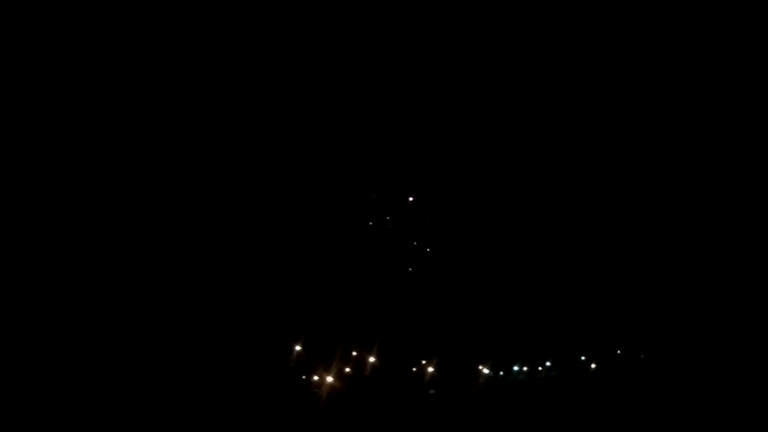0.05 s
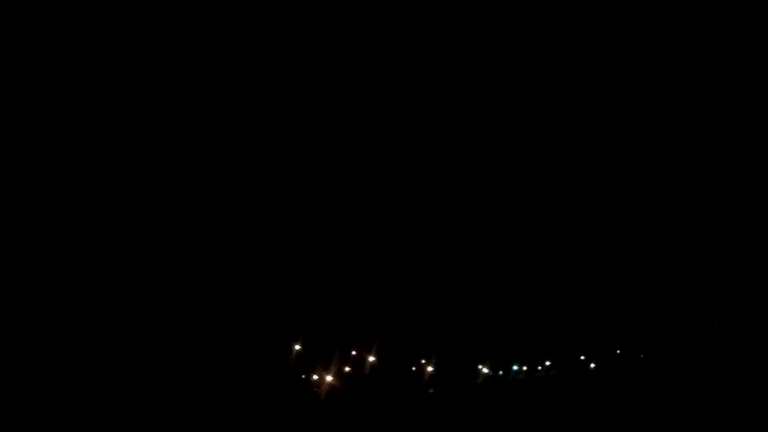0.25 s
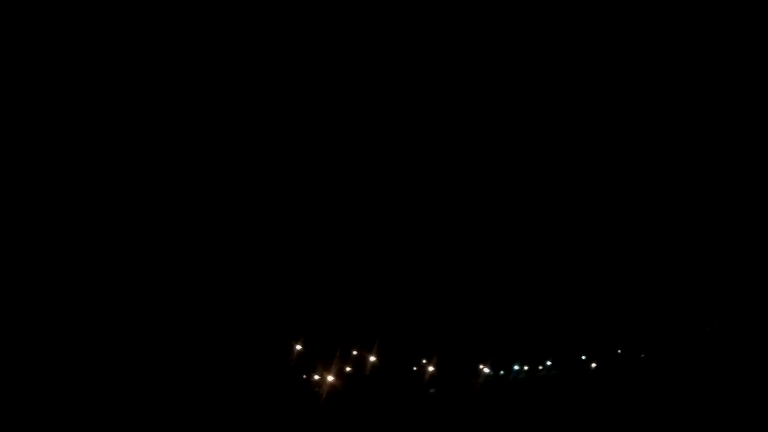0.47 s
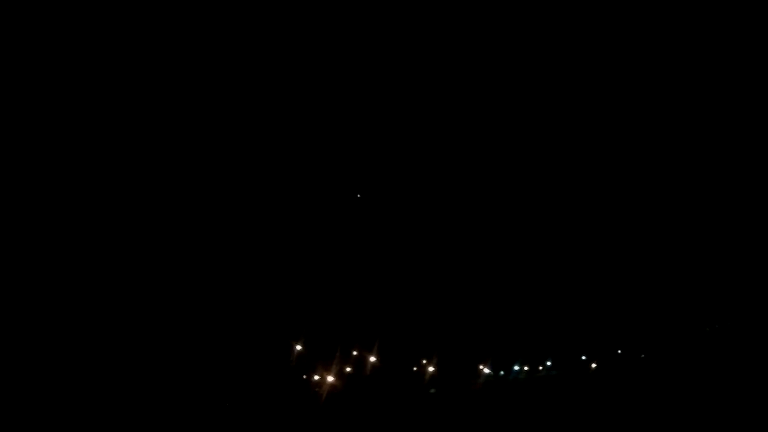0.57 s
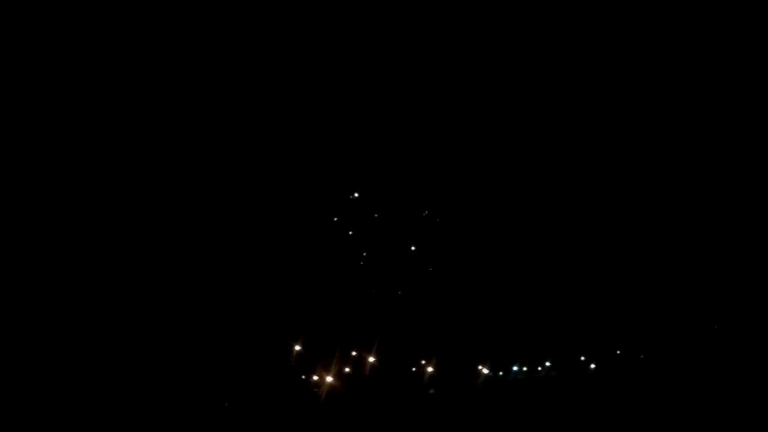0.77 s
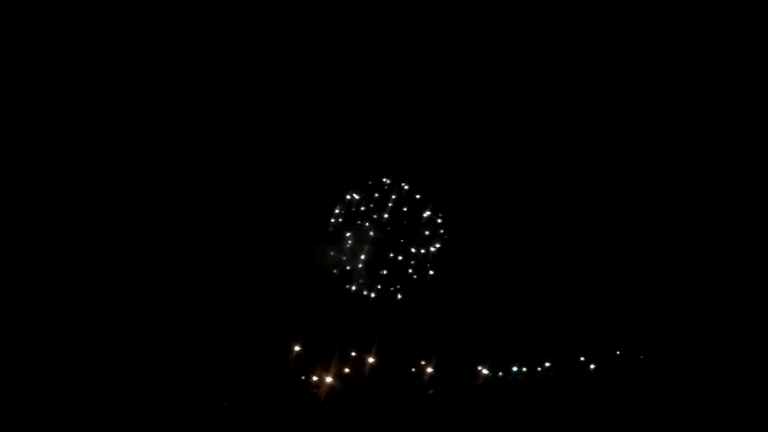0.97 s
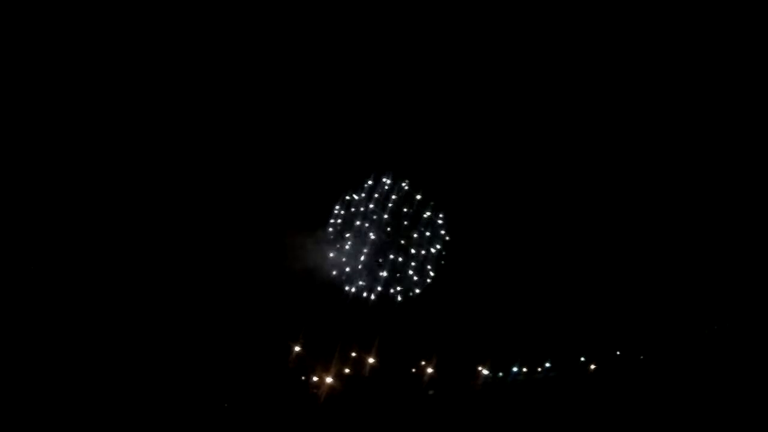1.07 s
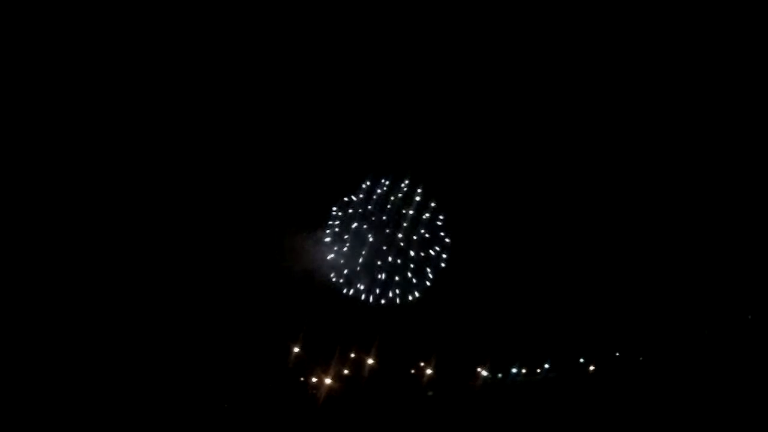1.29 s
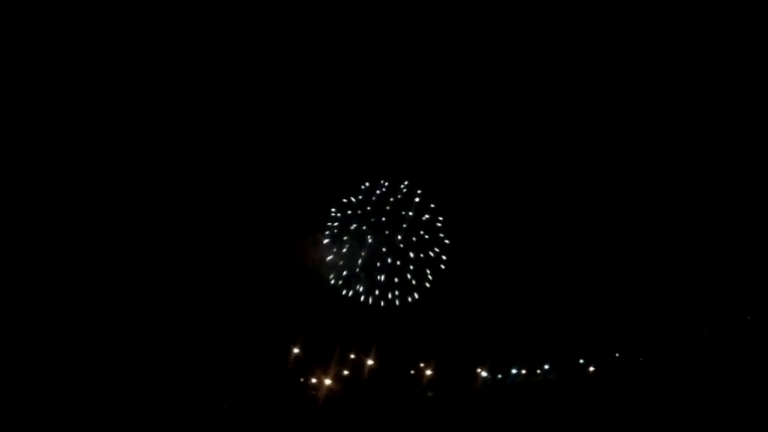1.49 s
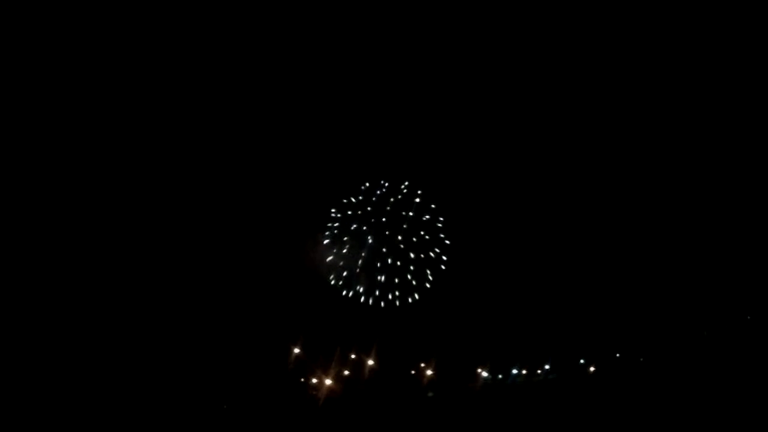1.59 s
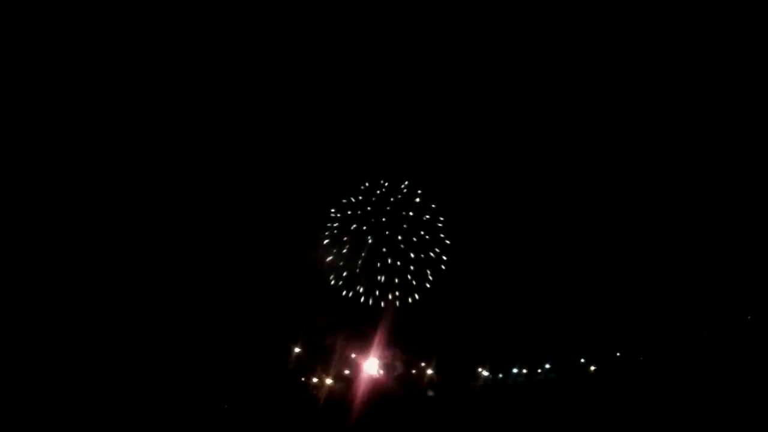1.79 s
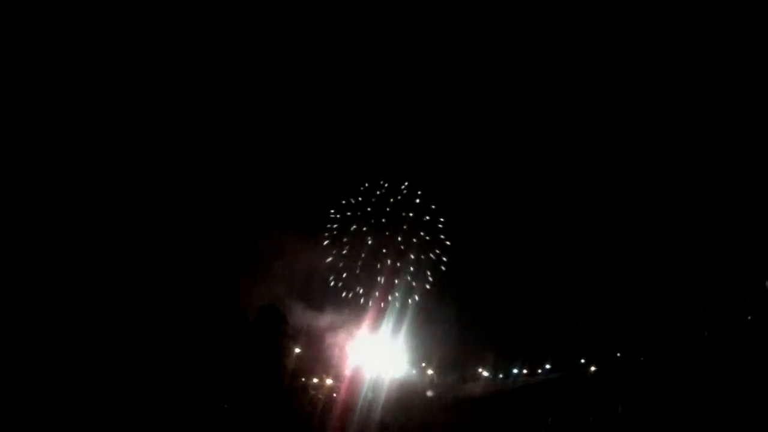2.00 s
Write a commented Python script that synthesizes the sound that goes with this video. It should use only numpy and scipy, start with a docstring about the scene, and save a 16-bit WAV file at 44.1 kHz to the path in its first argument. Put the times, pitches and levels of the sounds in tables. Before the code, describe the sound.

An aerial firework shell bursts with one hard bang and a long outdoor echo.

```python
"""One hard blast cracks through a faint rush of air: an aerial firework shell bursting at night.
Its shock front slaps back off nearby walls, then opens into a long outdoor tail of countless reflections,
with soft swells thrown back from far away and a few dull thumps. Distant whistles, thin wavering tones,
dip and rise in the tail, and a small fizzy pop comes at the end."""
import sys
import numpy as np
from scipy import signal
from scipy.fft import rfft, irfft, next_fast_len
from scipy.io import wavfile
from scipy.ndimage import map_coordinates

SR = 44100
rng = np.random.default_rng(int(sys.argv[2]) if len(sys.argv) > 2 else 0)


def waveform_to_disk(signal):
    """Save audio, clipped to [-1, 1], as 16-bit WAV at the path in sys.argv[1]."""
    frames = np.transpose(np.atleast_2d(signal))
    scaled = np.clip(frames, -1, 1) * 32767
    samples = np.round(scaled).astype(np.int16)
    wavfile.write(sys.argv[1], SR, samples)


N = 90404
T = np.arange(N) / SR
FFT_SIZE = next_fast_len(N + SR // 2)
HZ = np.fft.rfftfreq(FFT_SIZE, 1 / SR)
BURST_S = 0.2092


def amp(db):
    """Decibels to gain."""
    return 10 ** (np.asarray(db) / 20)


def curve_at(points, hz):
    """Read (freq_hz, value) points on a log frequency axis."""
    freqs, values = np.transpose(points)
    return np.interp(np.log(hz + 1), np.log(freqs + 1), values)


def filtered(x, gain):
    """Apply a gain per frequency."""
    return irfft(rfft(x, FFT_SIZE) * gain, FFT_SIZE)[:N]


def minimum_phase(colour):
    """The causal frequency response of an EQ curve: nothing rings ahead of the attack."""
    cepstrum = irfft(np.log(amp(curve_at(colour, HZ))), FFT_SIZE)
    cepstrum[1:FFT_SIZE // 2] *= 2
    cepstrum[FFT_SIZE // 2:] = 0
    return np.exp(rfft(cepstrum))


def noise(colour, cutoff_hz=SR):
    """Coloured noise of rms 1, dulled above the cutoff."""
    gain = amp(curve_at(colour, HZ)) / np.hypot(1, (HZ / cutoff_hz) ** 2)
    hiss = filtered(rng.standard_normal(N), gain)
    return hiss / np.sqrt(np.mean(hiss ** 2) + 1e-20)


def decay(start_s, t60_s, rise_s=0):
    """An envelope that rises from its start, then dies away."""
    age = np.maximum(T - start_s, 0)
    attack = 1 - np.exp(-age / (rise_s + 1 / SR))
    return attack * np.exp(-np.log(1000) * age / t60_s)


def wobble(rate_hz):
    """A smooth random curve with rate_hz knots a second."""
    return map_coordinates(rng.standard_normal(N), [T * rate_hz + 2])


def push(centre_s, peak_db, pitch_hz, cycles):
    """A short swing of pressure under a bell envelope; cycles is its half width."""
    turns = (T - centre_s) * pitch_hz
    return amp(peak_db) * np.cos(2 * np.pi * turns) * np.exp(-(turns / cycles) ** 2)


def shock(start_s, colour, cutoff_hz=SR):
    """A sharp pressure front of peak 1, dulled above the cutoff."""
    delay = np.exp(-2j * np.pi * HZ * start_s)
    front = irfft(minimum_phase(colour) * delay / (1 + 1j * HZ / cutoff_hz) ** 2, FFT_SIZE)[:N]
    return -front / np.abs(front).max()


def night_air():
    """A faint steady bed of rushing air."""
    # air colour: freq_hz, gain_db
    colour = [(15, -58), (25, 1), (146, -4), (243, -4), (335, -11), (404, -8), (501, -7.5), (673, -12.5),
              (729, -11), (2430, -17.5), (2930, -17.5), (5010, -24), (15000, -36)]
    return amp(-59.5) * noise(colour)


def whistle(path, waver, flutter_db):
    """A nearly pure gliding tone that wavers, and turns rough if it lasts past rough_s."""
    # second and third harmonics, against the fundamental: level_db
    overtones = [-40, -35]
    rough_s = 1.3
    times, pitches, levels = np.transpose(path)
    drift = waver * np.where(T > rough_s, 2.5, 1) * wobble(260)
    phase = 2 * np.pi * np.cumsum(np.interp(T, times, pitches) * (1 + drift)) / SR
    tone = np.sin(phase) + sum(amp(db) * np.sin(k * phase) for k, db in enumerate(overtones, 2))
    envelope = amp(np.interp(T, times, levels) + flutter_db * wobble(112))
    gate = (T > times[0]) * (T < times[-1])
    return np.sqrt(2) * tone * envelope * gate


def distant_whistles():
    """Three whistles with the thin echo of open ground."""
    # lead whistle, dipping and rising: time_s, pitch_hz, level_db
    lead = [(1.102, 1857, -56), (1.112, 2010, -49), (1.132, 2251, -53), (1.174, 2090, -55.5),
            (1.202, 1856, -49.5), (1.256, 1859, -50), (1.302, 1940, -41), (1.328, 2274, -53),
            (1.344, 2284, -44), (1.362, 2237, -61)]
    # fainter whistle that joins it: time_s, pitch_hz, level_db
    second = [(1.2, 2470, -67), (1.245, 2220, -58), (1.285, 2175, -47.5), (1.31, 2170, -55),
              (1.33, 2400, -49), (1.355, 2350, -60)]
    # blurred whistle held farther off: time_s, pitch_hz, level_db
    far = [(.87, 2492, -62), (.92, 2620, -54), (.98, 2582, -56), (1.09, 2580, -66)]
    direct = (whistle(lead, waver=0.0056, flutter_db=1.5)
              + whistle(second, waver=0.0096, flutter_db=3)
              + whistle(far, waver=0.026, flutter_db=2.5))
    reverb = rng.standard_normal(N) * decay(0, t60_s=0.55)
    wet = signal.fftconvolve(direct, reverb / np.linalg.norm(reverb))[:N]
    return direct + amp(-11.5) * wet


def pop():
    """A small low push with a brief double chirp and a little fizz."""
    # two bright pips: centre_s, peak_db, pitch_hz
    pips = [(2.0085, -47.5, 2396), (2.0147, -45.5, 2260)]
    # fizz colour: freq_hz, gain_db
    fizz_colour = [(500, -10), (1700, 2), (2500, 3), (3000, -9), (4500, -10), (7000, -32)]
    pop_s = 2.0063
    body = push(pop_s, peak_db=-45, pitch_hz=173, cycles=0.74)
    chirps = sum(push(s, db, hz, cycles=6.8) for s, db, hz in pips)
    fizz = amp(-44.5) * noise(fizz_colour) * decay(pop_s, t60_s=0.038, rise_s=0.0033)
    return body + chirps + fizz


def thumps():
    """Low pushes of air with no treble left."""
    # dull hits: centre_s, peak_db, pitch_hz
    hits = [(0.2318, -25.5, 176), (0.342, -25.5, 145), (0.6196, -31.5, 50), (.765, -41, 51.4),
            (1.163, -41, 87)]
    return sum(push(s, db, hz, cycles=0.44) for s, db, hz in hits)


def reflections(colour, t60s, rise_s, flutter_db):
    """Countless uneven reflections of the blast; each frequency dies at its own speed."""
    hz, times, spectrum = signal.stft(noise(colour), SR, nperseg=512)
    age = np.maximum(times - BURST_S, 0)
    fade = np.exp(-np.log(1000) * age / curve_at(t60s, hz)[:, None])
    wash = signal.istft(spectrum * fade, SR, nperseg=512)[1][:N]
    return wash * decay(BURST_S, np.inf, rise_s) * amp(flutter_db * wobble(69.65))


def outdoor_tail():
    """Near reflections arrive at once; far ones bloom slowly and linger."""
    # near tail colour: freq_hz, gain_db
    near_colour = [(25, -21), (80, 10.5), (150, 13), (250, 8.5), (600, -1), (1400, -3), (2100, -1.5),
                   (3200, 2), (4400, -10.5), (7000, -20.5), (10500, -32.5), (15000, -49)]
    # near tail decay: freq_hz, t60_s
    near_t60s = [(60, 1.17), (170, 1.3), (380, 0.92), (1000, 1.1), (2500, 1.12), (10000, 1.13)]
    # far tail colour: freq_hz, gain_db
    far_colour = [(25, -11), (55, 6.5), (120, 10.5), (300, -2.5), (600, -1.5), (1200, 0), (2100, -1),
                  (2900, -2), (4400, -12), (8000, -44), (15000, -50)]
    # far tail decay: freq_hz, t60_s
    far_t60s = [(60, 4.6), (300, 4.35), (1200, 3.74), (4000, 3.38)]
    near = amp(-31.5) * reflections(near_colour, near_t60s, rise_s=0.002, flutter_db=1.1)
    far = amp(-37) * reflections(far_colour, far_t60s, rise_s=0.52, flutter_db=1.4)
    return near + far


def far_echoes():
    """Smeared swells off far slopes, and a low roll from the terrain behind them."""
    # soft echoes: start_s, level_db, rise_s, t60_s, cutoff_hz
    arrivals = [(0.336, -32.5, 0.03, 0.45, 4300), (.616, -34.5, .003, 0.076, 2950),
                (0.627, -32, .006, .17, 3700), (.928, -38, 0.0058, 0.13, 1770),
                (1.157, -45.5, 0.0023, 0.089, 450), (1.423, -46.5, 0.011, 0.3, 1000)]
    # swell colour: freq_hz, gain_db
    swell_colour = [(60, -2), (200, -1.5), (430, -10), (800, -2), (1200, 0), (1650, -1.5), (2100, -3),
                    (2800, -1.5), (4300, -14), (7000, -22), (15000, -54)]
    # bass-heavy roll colour: freq_hz, gain_db
    roll_colour = [(40, -11), (110, 2), (290, -1), (550, -8), (1300, -13), (3000, -30), (8000, -62)]
    swells = sum(amp(db) * noise(swell_colour, cutoff) * decay(start, t60, rise)
                 for start, db, rise, t60, cutoff in arrivals)
    roll = amp(-48.5) * noise(roll_colour) * decay(0.847, t60_s=1, rise_s=0.032)
    return swells + roll


def wall_slaps():
    """Nearby walls each throw back a sharp front with a short spray of scatter."""
    # slapbacks: start_s, level_db, t60_s, cutoff_hz
    arrivals = [(.2237, -25.5, 0.024, 9800), (.3094, -28, 0.026, 9000), (0.3359, -22, 0.038, 4500),
                (.3485, -29, 0.059, 4500), (.408, -35, .04, 4620)]
    # slap colour: freq_hz, gain_db
    colour = [(80, -46), (300, 5.5), (650, -4.5), (1300, -0.5), (2200, -4.5), (3100, -1), (4300, -9),
              (5300, -14.5), (7000, -19), (15000, -48)]
    slaps = np.zeros(N)
    for start, db, t60, cutoff in arrivals:
        front = amp(7) * shock(start, colour, cutoff)
        scatter = noise(colour, cutoff) * decay(start, t60)
        slaps += amp(db) * (front + scatter)
    return slaps


def blast():
    """The shell's shock front, the short ring it leaves and its scatter off the ground close by."""
    # shock front colour: freq_hz, gain_db
    crack_colour = [(25, -25.5), (85, 6.5), (170, -2.5), (300, 6), (550, 2), (1100, 0.5), (2000, -11),
                    (3100, -6), (4300, -22.5), (6800, -29), (8200, -29), (13000, -50), (16000, -71)]
    # resonances of the surroundings: pitch_hz, level_db, t60_s
    modes = [(284, 2, 0.027), (408, -11, 0.028), (697, -9, 0.021), (776, -12.5, 0.023), (1017, -5, 0.03),
             (1330, -15.5, 0.039), (1475, -16, 0.045), (2540, -13.5, .02), (2890, -6.5, 0.013),
             (3176, -7, 0.019), (3910, -9, 0.027), (4705, -8.5, 0.019)]
    # ground scatter colour: freq_hz, gain_db
    scatter_colour = [(100, -1), (600, -16), (1400, -17), (2100, 7), (3300, 3.5), (4300, -15), (5300, -8.5),
                      (6800, -19.5), (8200, -20), (12500, -39), (16000, -49)]
    ring = sum(amp(db) * np.cos(2 * np.pi * hz * (T - BURST_S)) * decay(BURST_S, t60, rise_s=0.0011)
               for hz, db, t60 in modes)
    scatter = noise(scatter_colour) * decay(BURST_S, t60_s=0.037, rise_s=0.001)
    return shock(BURST_S, crack_colour) + amp(-14.5) * scatter - amp(-9) * ring


def scene():
    """The mono mix, heard from one spot on the ground."""
    # colour the listening spot gives the blast and all its echoes: freq_hz, gain_db
    spot_colour = [(380, 0), (540, -4), (780, 1), (900, -3), (1100, 2), (1420, -1), (1600, 3), (1750, -2),
                   (1900, 1), (2120, -5), (2600, 3), (3350, -1), (3800, 3), (4250, -5), (4750, 3),
                   (5600, 0), (6900, -3), (7900, 1), (10000, 0)]
    shell = outdoor_tail() + blast() + wall_slaps() + far_echoes()
    shell = filtered(shell, minimum_phase(spot_colour))
    return (shell + thumps() + pop() + distant_whistles() + night_air())[None]


def record(dry):
    """Hard-clip at full scale, then cut the very top with a steep low-pass."""
    cutoff_hz = 15400
    clipped = np.clip(dry[0], -1, 1)
    return filtered(clipped, 1 / np.hypot(1, (HZ / cutoff_hz) ** 60))[None]


dry = scene()
out = record(dry)
waveform_to_disk(out)
```